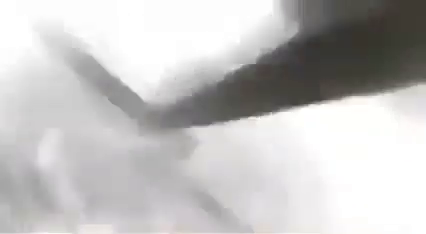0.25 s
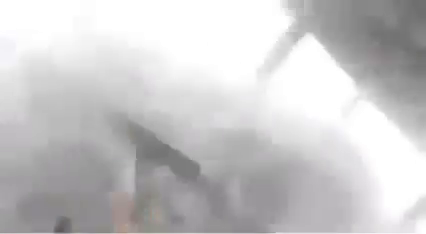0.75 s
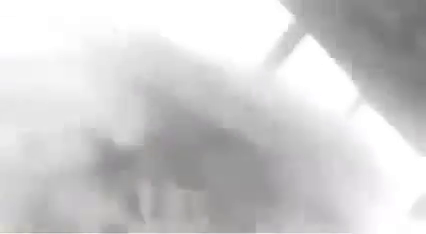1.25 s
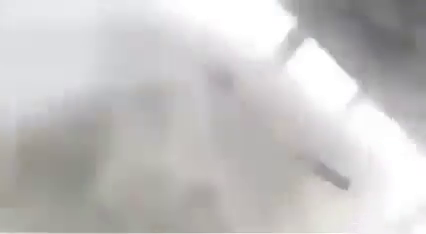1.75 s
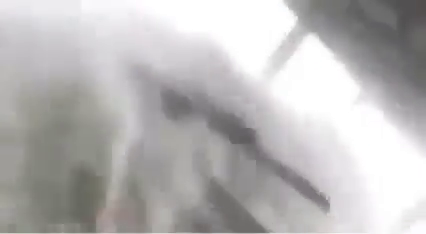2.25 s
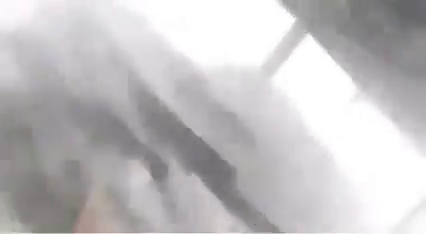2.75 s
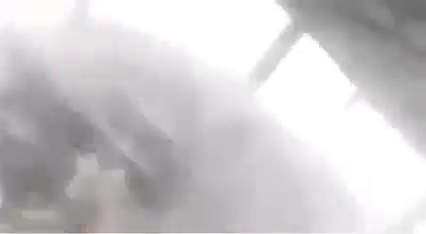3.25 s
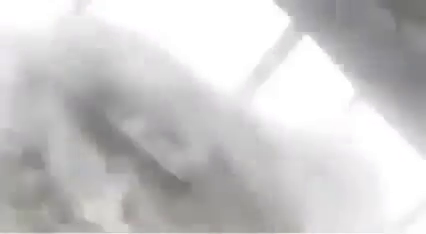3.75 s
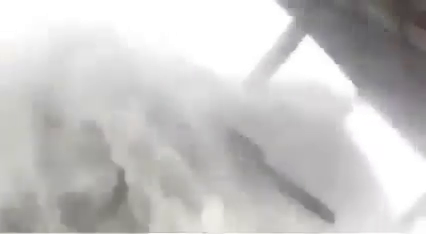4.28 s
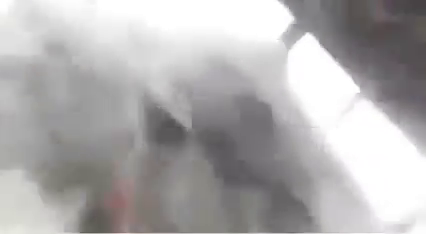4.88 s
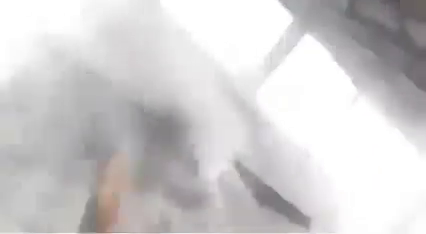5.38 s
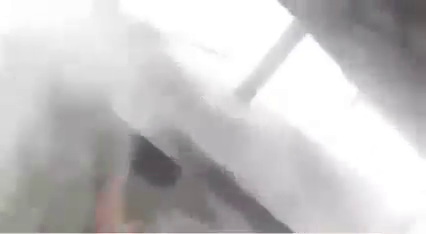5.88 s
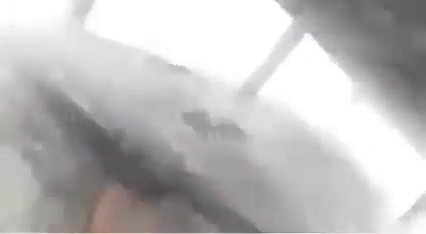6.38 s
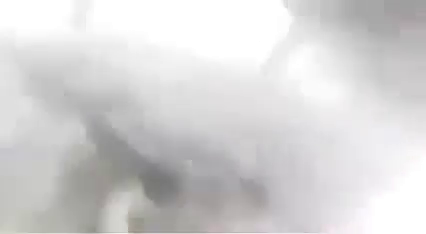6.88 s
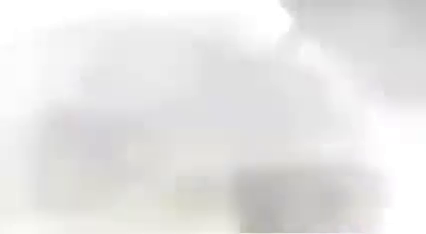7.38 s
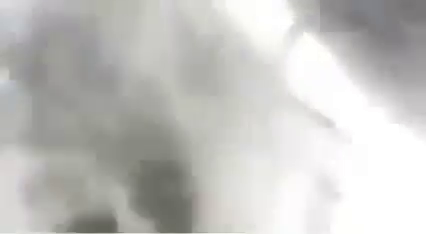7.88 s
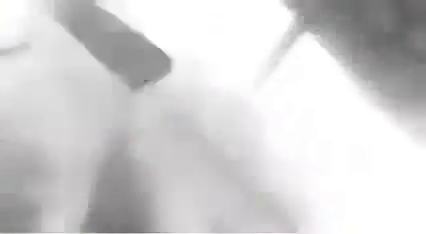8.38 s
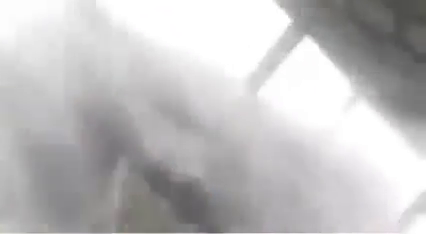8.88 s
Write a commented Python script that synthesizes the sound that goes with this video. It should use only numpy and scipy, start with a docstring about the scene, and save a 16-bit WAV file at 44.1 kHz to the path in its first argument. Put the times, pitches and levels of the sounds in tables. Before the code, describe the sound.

Storm wind and driven rain hit a small hand-held microphone outdoors, extremely close, overloaded and almost mono. From 0 to 2 s a loud distorted roar with low fluttering thuds and hissing spray, briefly choked at moments; a hollow, breathy howl comes near 0.4-0.6 s and a higher wavering one at 1.5-2 s. At 2 s it drops, then breaks into abrupt puffs, blunt knocks and wet slaps over crackling drops, strong around 2.2-3.7 s, sparser and drier from 4 to 5.6 s with a cluster of slaps near 4.4-4.8 s. A heavy slap at 6 s opens a sustained clipped gust until about 7.4 s. The volume then falls away, with a weak airy howl from 7.45 s. From about 7.8 to 9 s only faint rustling, tiny ticks and a thin steady high whine remain, until a short gust thumps at 9 s.

```python
"""Outdoors in a storm, wind and driven rain batter one small hand-held microphone.
Turbulent eddies, as noise of shared random level, shove the membrane in low lumps, roar and hiss as spray.
Drops tick and slap as brief pushes; three howls are noise through the port's wandering resonance.
The input stage overloads in the gusts, flattening the waves. Near the end the volume is turned down, in
the levels and in the overload ceiling, and a faint steady whine shows in the lull."""
import sys
import numpy as np
from scipy import signal
from scipy.fft import rfft, irfft, next_fast_len
from scipy.io import wavfile

SR = 44100
rng = np.random.default_rng(int(sys.argv[2]) if len(sys.argv) > 2 else 0)


def unload_wav(signal):
    """Save mono or channel-first audio to the path in sys.argv[1] as 16-bit WAV at rate SR, clipped to [-1, 1]."""
    wavfile.write(
        sys.argv[1],
        SR,
        np.round(np.clip(np.atleast_2d(signal).T, -1, 1) * 32767).astype(np.int16),
    )


N = 402985

# spectrum of the turbulent roar, before scaling to rms 1: f/Hz, density level/dB
ROAR_SPECTRUM = [(120, -9), (300, 1), (700, -2.5), (1500, -8), (3000, -10.5), (5000, -14), (9000, -37.5)]
# spectrum of air and spray hissing across the port, before scaling to rms 1: f/Hz, density level/dB
SPRAY_SPECTRUM = [(1500, -17.5), (3000, -7), (4500, -5), (5600, -1), (6600, 2.5), (7400, -9.5), (10000, -7)]


def gain_of(db):
    """Level to amplitude ratio: 20 dB for each factor of ten."""
    return 10 ** (np.asarray(db) / 20)


def evened(x):
    """Normalisation: scales a signal to rms 1."""
    return x / np.sqrt(np.mean(x ** 2) + 1e-20)


def curve(rows, axis):
    """Linear interpolation: one column of a table at every sample, time being column 0."""
    rows = np.asarray(rows)
    return np.interp(np.arange(N) / SR, rows[:, 0], rows[:, axis])


def coloured(points):
    """Spectral shaping: white noise weighted along a log-frequency curve, then scaled to rms 1."""
    size = next_fast_len(N)
    f, db = np.transpose(points)
    hz = np.fft.rfftfreq(size, 1 / SR)
    weight = gain_of(np.interp(np.log(hz + 1), np.log(f), db))
    white = rfft(rng.standard_normal(size))
    return evened(irfft(white * weight, size)[:N])


def lumps(lo_hz, hi_hz):
    """Band-limited random modulation: a wander of rms 1 mostly between two rates."""
    return coloured([(lo_hz / 2, -40), (lo_hz, 0), (hi_hz, -6), (hi_hz * 2, -30), (hi_hz * 8, -120)])


def swings(rows, in_s, out_s):
    """Superposition in dB of level swings that ease in, hold and ease out along a squared sine."""
    t = np.arange(N) / SR
    total_db = np.zeros(N)
    for start, length, db in rows:
        full = start + in_s / 2
        leaving = full + max(length - in_s / 2 - out_s / 2, 0)
        end = start + max(length, in_s) + out_s / 2
        ramp = np.interp(t, [start - in_s / 2, full, leaving, end], [0, 1, 1, 0])
        total_db += db * np.sin(np.pi / 2 * ramp) ** 2
    return total_db


def puff_rise_db():
    """Gust modulation: short puffs raise the level."""
    # puffs at full share: start t/s, length/s, rise/dB
    puff_rows = [(2.213, 0.039, 17), (2.6, 0.028, 3.5), (2.92, 0.055, 9), (3.42, 0.029, 14.5),
                 (3.52, 0.055, 10), (3.625, 0.057, 7), (3.985, 0.018, 6.5), (4.06, 0.051, 5),
                 (4.405, 0.024, 6.5), (4.785, 0.052, 8.5), (5.27, 0.035, 7), (5.355, 0.032, 6.5),
                 (5.7, 0.031, 7), (6.04, 0.017, 7), (7.97, .045, 9.5), (8.615, 0.11, 3.5),
                 (9.085, 0.023, 7)]
    return swings(puff_rows, in_s=.01, out_s=0.045)


def lull_drop_db():
    """Shielding: the level falls while the port is sheltered."""
    # sheltered moments at full share: start t/s, length/s, change (negative)/dB
    lull_rows = [(.57, 0.076, -10.5), (1.385, .15, -11), (1.445, .055, -10), (2.15, .06, -9),
                 (2.255, 0.072, -8), (2.43, 0.048, -7), (2.665, .04, -1), (2.78, 0.052, -11.5),
                 (3.03, 0.023, -7.5), (3.25, 0.11, -11.5), (3.45, 0.029, -5), (3.585, 0.041, -1),
                 (4.235, 0.081, -9.5), (4.585, 0.024, -6), (4.85, .05, -4.5), (5.04, 0.027, -5.5),
                 (5.18, 0.11, -6), (5.735, .03, -5.5), (6.0, 0.033, -8), (7.89, 0.076, -5.5),
                 (8.025, 0.027, -7), (8.155, .03, -1), (8.47, .14, -16), (8.52, 0.086, -8.5),
                 (8.705, .025, -8), (8.91, 0.12, -2.5)]
    return swings(lull_rows, in_s=0.047, out_s=0.045)


def wind_db():
    """Addition of levels: the slow course of the wind, lifted by puffs and lowered by lulls."""
    # slow course at the port: t/s, buffeting level/dB, roar level/dB, spray level/dB
    slow_course = [(0, -0.5, -3.5, -21), (.1, -10, -14, -11), (.38, -3, -14, -8.5),
                   (.46, -10.5, -7.5, -22.5), (.55, -2.5, -15.5, -19), (.65, -10, -12, -19),
                   (.72, -6, -12, -10), (1.02, -7, -16, -11), (1.14, -10, -10.5, -12.5),
                   (1.37, -5, -11.5, -7), (1.54, -8.5, -10.5, -31), (1.97, -6.5, -10.5, -28),
                   (2.01, -25, -27.5, -40), (2.2, -30, -31, -30.5), (2.32, -10, -21, -20),
                   (2.96, -11.5, -21, -18.5), (3.02, -23, -28, -24), (3.42, -24.5, -29.5, -32),
                   (3.66, -15, -26, -16.5), (3.8, -25.5, -32.5, -30), (3.95, -19, -27, -20.5),
                   (4.3, -32, -34, -33.5), (4.7, -15, -32.5, -32), (5.1, -24, -37, -36.5),
                   (5.4, -23.5, -35, -32), (5.67, -23, -33, -30), (5.7, -15.5, -22.5, -16.5),
                   (5.98, -6.5, -21, -16), (6.12, -12.5, -17.5, -11), (6.3, -6, -19.5, -16.5),
                   (6.62, -6.5, -19, -16), (7.1, -8, -14, -8), (7.43, -15, -21, -16),
                   (7.5, -15.5, -18, -28), (7.62, -22.5, -31, -50), (7.85, -33.5, -33.5, -50),
                   (8.16, -39, -44, -57), (8.21, -35, -45, -39.5), (8.42, -39.5, -41, -42),
                   (8.97, -50, -49, -48), (9.01, -17.5, -32.5, -26), (9.14, -32.5, -36, -35.5)]
    # how far buffeting, roar and spray follow, as fractions of the dB swing
    puff_share, lull_share = (0.88, 0.87, 0.84), (0.53, 1, 0.77)
    puffs, drops = puff_rise_db(), lull_drop_db()
    return [curve(slow_course, axis=k + 1) + puff_share[k] * puffs + lull_share[k] * drops
            for k in range(3)]


def wind(levels_db):
    """Turbulence: buffeting, roar and spray share the same eddies, each by its own amount."""
    # spectrum of the eddies' pressure before skewing and scaling: f/Hz, density level/dB
    buffet_spectrum = [(8, -14), (24, 1.5), (60, 2), (120, -2.5), (250, -9), (500, -19), (1200, -37.5)]
    eddies, flutter = lumps(8.2, 22.0), lumps(31.0, 290.0)
    pushes = np.exp(.38 * coloured(buffet_spectrum))  # eddies push in harder than they pull
    high_pass = signal.butter(N=2, Wn=12., btype="high", fs=SR)
    buffet = signal.lfilter(*high_pass, pushes - pushes.mean())
    buffet = evened(buffet * gain_of(3.9 * eddies))
    roar = evened(coloured(ROAR_SPECTRUM) * gain_of(2.04 * eddies + 0.52 * flutter))
    spray_swing_db = 1.64 * eddies + 0.93 * flutter + 2.15 * lumps(3.3, 47.0)
    spray = evened(coloured(SPRAY_SPECTRUM) * gain_of(spray_swing_db))
    return sum(gain_of(db) * part for db, part in zip(levels_db, [buffet, roar, spray]))


def slaps():
    """Impulse and recoil: water or a sharp eddy pushes, holds, and swings back further the longer it held."""
    # slaps on the port: t/s, spray burst level/dB, push level/dB, hold/s
    slap_rows = [(1.515, -14, -3, 0.00064), (1.53, -19, -7, .0048), (2.072, -34, -9, 0.00025),
                 (2.103, -17.5, -16, 0.00051), (2.216, -4.5, 1.5, 0.0059), (2.226, -6.5, 2.5, .004),
                 (2.248, -16, -7, .00079), (2.334, -25, 0, 0.003), (2.38, -13, -4, 0.007),
                 (2.48, -9, -15, .00091), (2.497, -13, -10, 0.00037), (2.742, -17, -10, 0.0018),
                 (2.83, -25, -7.5, .0049), (2.846, -10, -10, .0014), (3.073, -11, -5.5, .001),
                 (3.167, -13, -10, 0.0011), (3.19, -37, -6, 0.0037), (3.236, -16, -14, 0.0055),
                 (3.35, -17.5, -27, .002), (3.423, -16, 2, 0.0051), (3.494, -3.5, 2, 0.0015),
                 (3.528, -18, -3, 0.0034), (3.542, -11, -5.5, 0.0035), (3.627, -5, -2.5, 0.0024),
                 (3.658, -11, -9, 0.0024), (3.711, -27, -8.5, 0.0034), (3.941, -27, -4, 0.0034),
                 (3.998, -14, -14, 0.0028), (4.068, -14, 1, 0.0013), (4.201, -25, -12, .0006),
                 (4.353, -14, -10, 0.00064), (4.372, -16, -12, .0009), (4.412, -16, -27, .0024),
                 (4.429, -17, -6, 0.00081), (4.491, -21, -8, 0.0005), (4.548, -16.5, -11, 0.0007),
                 (4.568, -17.5, -13, .00084), (4.614, -21, -10.5, 0.00068), (4.635, -10, -2.5, 0.0031),
                 (4.647, -18, -8, 0.0021), (4.67, -12, -20, .0023), (4.683, -15, -10, 0.003),
                 (4.713, -21, -5, .00051), (4.744, -26, -6.5, 0.0041), (4.787, -29, -3.5, 0.014),
                 (4.803, -24, 0.5, 0.0041), (4.988, -20.5, -7, 0.0066), (5.095, -22, -5, 0.0038),
                 (5.03, -24, -17, .0006), (5.16, -16.5, -12, 0.00059), (5.267, -31, -5, .004),
                 (5.287, -14.5, -20, .0012), (5.371, -22, -9, 0.0018), (5.495, -17, -19, 0.00039),
                 (5.696, -25, -3.5, 0.0083), (5.763, -23, -5, 0.0023), (5.995, 0.5, 3.5, 0.0036),
                 (6.036, -2, -18, .0011), (8.238, -30, -42, 0.00067), (8.385, -45, -22.5, 0.0096),
                 (8.615, -40, -35, .00064), (8.696, -32, -24, 0.00045), (8.733, -57, -27, 0.00082),
                 (8.83, -33, -25, .0015), (8.885, -38, -28, 0.0025), (9.02, -28, -15, 0.004),
                 (9.11, -33, -12, 0.002)]
    t, out = np.arange(3000) / SR, np.zeros(N + 3000)
    hiss = np.tile(coloured(SPRAY_SPECTRUM) + 0.61 * coloured(ROAR_SPECTRUM), 2)
    for start, spray_db, push_db, hold in slap_rows:
        at = round(start * SR)
        released = np.clip((t - hold) / .0016, 0, 1)
        recoil = np.minimum(hold / 0.0076, .7) * np.exp(-np.maximum(t - hold - .009, 0) / .012)
        push = np.minimum(t / .0003, 1) * (1 - released) - released * recoil
        burst = hiss[at:at + 3000] * np.minimum(t / 0.00067, 1) * np.exp(-t / 0.0034)
        out[at:at + 3000] += gain_of(push_db) * push + gain_of(spray_db) * burst
    return out[:N]


def ticks(roar_db):
    """Poisson impacts: small drops push the membrane and let it swing weakly back; level follows the roar."""
    ticks_per_s = 160  # mean rate
    size_db = 3. * np.minimum(rng.exponential(1, N), 3)
    size = gain_of(size_db) * (rng.random(N) < ticks_per_s / SR)
    kind = rng.integers(0, 3, N)
    t = np.arange(400) / SR
    drops = np.zeros(N)
    for k, decay_s in enumerate((.00012, .0004, .0012)):
        push = np.exp(-t / decay_s) * (1 - 0.52 * t / decay_s)
        drops += signal.oaconvolve(size * (kind == k), push)[:N]
    return gain_of(roar_db - 0.5) * evened(drops)


def howl(rows, width_hz, flutter_db, upper_db=-13.0):
    """Resonance: noise through a wandering port mode and a weaker one an octave up."""
    t = np.arange(N) / SR
    start, end = rows[0][0], rows[-1][0]
    on = np.interp(t, [start, start + 0.041, end - .015, end], [0, 1, 1, 0])
    pitch_hz = curve(rows, axis=1) * (1 + .07 * lumps(6., 25.))
    turns = np.cumsum(pitch_hz) / SR
    out = np.zeros(N)
    for k, gain in ((1, 1.0), (2, gain_of(upper_db))):
        turn = np.exp(2j * np.pi * k * turns)
        r = np.exp(-np.pi * k * width_hz / SR)
        # noise shifted down to 0 Hz, smoothed twice and shifted back up to the pitch
        slow = rng.standard_normal(N) / turn
        for _ in range(2):
            slow = signal.lfilter([1 - r], [1, -r], slow)
        out += gain * evened((turn * slow).real)
    return on * gain_of(curve(rows, axis=2) + flutter_db * lumps(13.0, 25.0)) * out


def howls():
    """Flow excitation: air blown across the half-shut port howls, more weakly when it is sheltered."""
    # one table a howl, about which pitch and level wander: t/s, f/Hz, level/dB
    howl_courses = [
        [(.39, 696, -24), (.44, 900, -9.5), (.51, 800, -12.5), (.57, 600, -17)],
        [(1.52, 750, -25), (1.61, 934, -7.5), (1.74, 1350, -10.5), (1.79, 956, -8), (1.84, 1190, -10),
         (1.89, 916, -9), (1.98, 1410, -11.5), (2.0, 1290, -35)],
        [(7.45, 1160, -42), (7.51, 1220, -18), (7.6, 900, -23), (7.72, 1060, -36), (7.86, 1480, -32),
         (8.0, 1420, -41), (8.1, 1220, -41), (8.2, 1590, -41.5), (8.25, 1400, -47)],
    ]
    # one row a howl: width of each smoothing pass at the lower mode/Hz, rms level flutter/dB
    howl_settings = [(900, 1), (600, 1), (650, 4)]
    blown = sum(howl(rows, *setting) for rows, setting in zip(howl_courses, howl_settings))
    return gain_of(lull_drop_db()) * blown


def whine():
    """Sinusoid in noise: a thin steady tone, its level wavering, over the faint hiss of the electronics."""
    # tone: f/Hz, rms level about which it wavers/dB
    whine_tones = [(2116, -60.5)]
    floor_db = -86.5
    t = np.arange(N) / SR
    tone = np.zeros(N)
    for hz, db in whine_tones:
        tone += np.sqrt(2) * gain_of(db + lumps(2., 6.)) * np.sin(2 * np.pi * hz * t)
    return tone + gain_of(floor_db) * rng.standard_normal(N)


def scene():
    """Superposition at the port: one microphone feeds both channels."""
    levels_db = wind_db()
    port = wind(levels_db) + slaps() + ticks(levels_db[1]) + howls() + whine()
    return np.array([port, port])


def low_pass(x, hz, taps):
    """Linear-phase filtering: a steep symmetric low-pass along each channel."""
    kernel = signal.firwin(taps, hz, window=("kaiser", 9), fs=SR)
    return signal.oaconvolve(x, kernel[None], "same", axes=1)


def spread(x):
    """Decorrelation: a scrambled treble copy, coming and going, is added left and subtracted right."""
    smear = rng.standard_normal(300) * np.exp(-np.arange(300) / 80)
    high = signal.firwin(601, 4250, window=("kaiser", 6), pass_zero=False, fs=SR)
    treble = signal.oaconvolve(x, high, "same")
    scrambled = signal.oaconvolve(treble, smear / np.linalg.norm(smear))[:N]
    side = scrambled * np.clip(.13 + .29 * lumps(2.5, 9.), 0, 1)
    return np.array([x + side, x - side])


def record(dry, knee=13.0, leak=0.096):
    """Saturation and filtering: overload, treble lift, band limit, soft clipping and treble spread."""
    # volume turned down after the overload and partly up again, applied to the ceiling: t/s, level/dB
    volume_course = [(0, 0), (7.15, 0), (7.42, -5), (7.6, -11), (7.73, -19), (8.9, -19), (9.0, -12),
                     (9.14, -8)]
    ceiling, edge_hz, top_hz = 0.66, 7230, 15800
    top = ceiling * gain_of(curve(volume_course, axis=1))  # the flat tops come down with the volume
    flat = dry[0] / (1 + abs(dry[0] / top) ** knee) ** (1 / knee)
    # some hiss rides on the tops
    flat = flat + leak * signal.lfilter(*signal.butter(N=2, Wn=1000., btype="high", fs=SR), dry[0])
    # the flat tops sag slowly
    flat = signal.lfilter(*signal.butter(1, 6., "high", fs=SR), flat)
    lifted = flat + .5 * signal.lfilter(*signal.iirpeak(6950., 3.5, fs=SR), flat)
    narrow = low_pass(lifted[None], edge_hz, taps=601)[0]
    # unequal exponents: peaks past the knee still grow a little
    narrow = narrow / (1 + abs(narrow / 0.95) ** 12.0) ** (1 / 18.8)
    return np.clip(low_pass(spread(narrow), top_hz, taps=201), -1, 1)


dry = scene()
out = record(dry)
unload_wav(out)
```